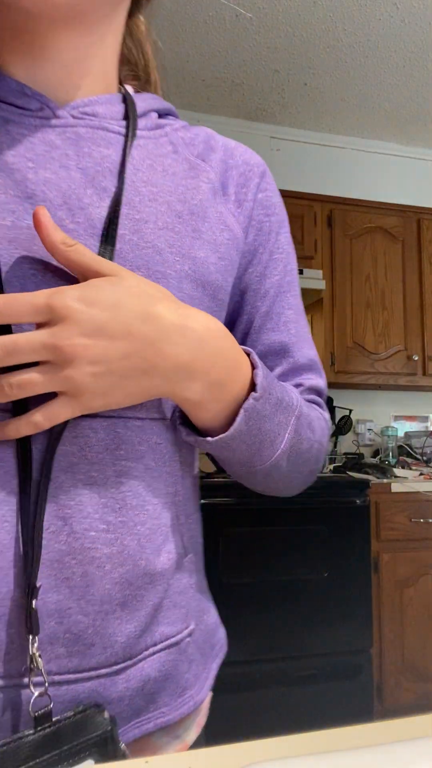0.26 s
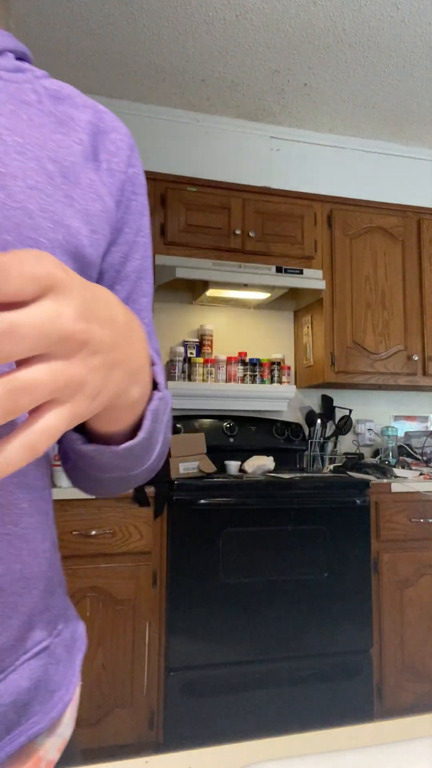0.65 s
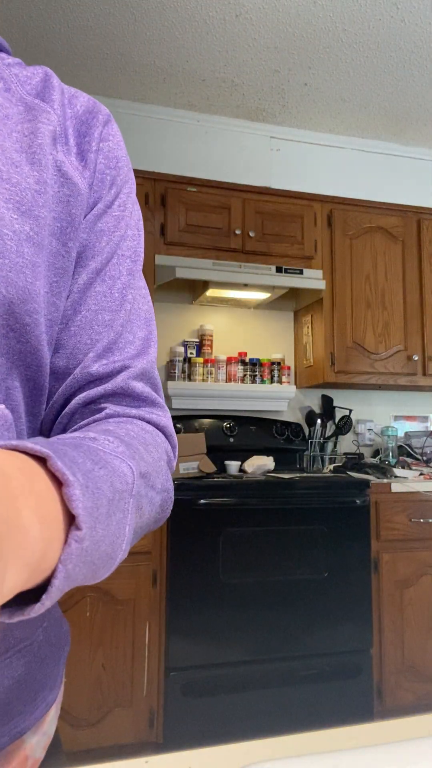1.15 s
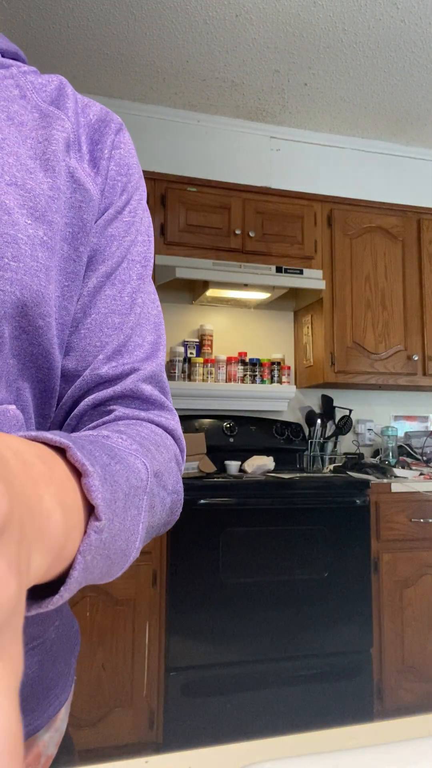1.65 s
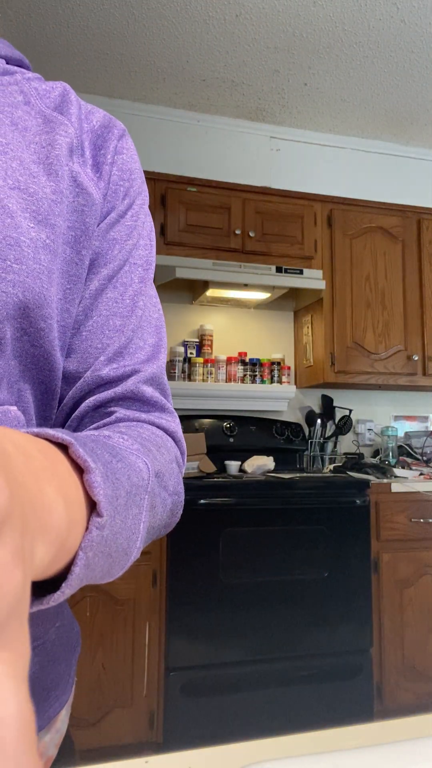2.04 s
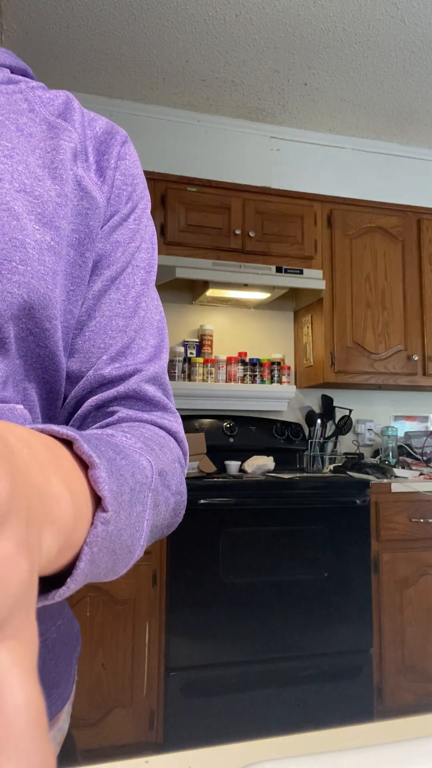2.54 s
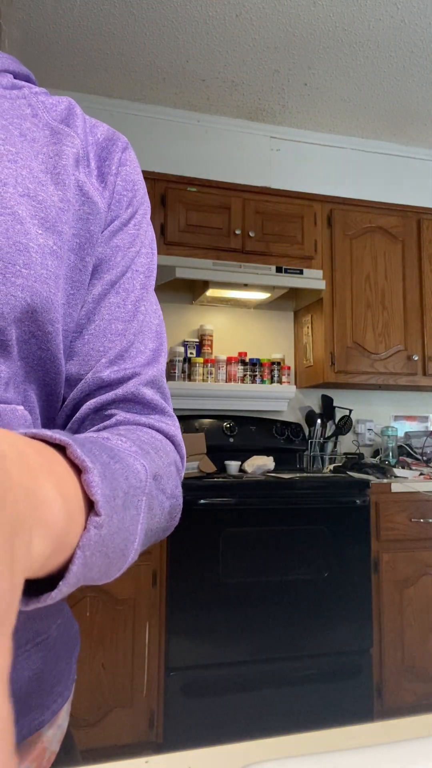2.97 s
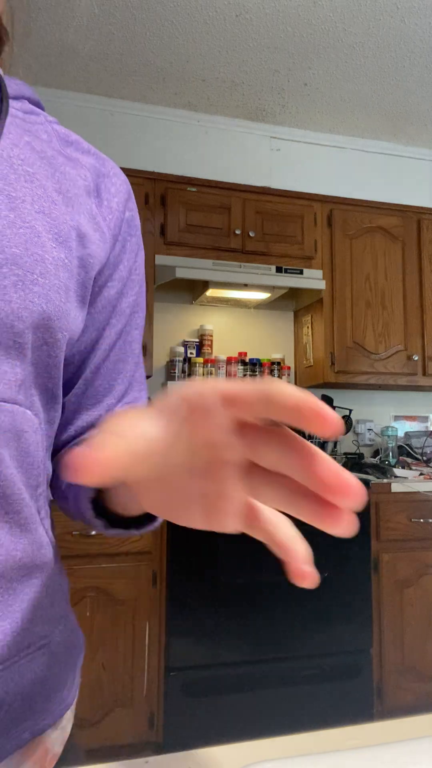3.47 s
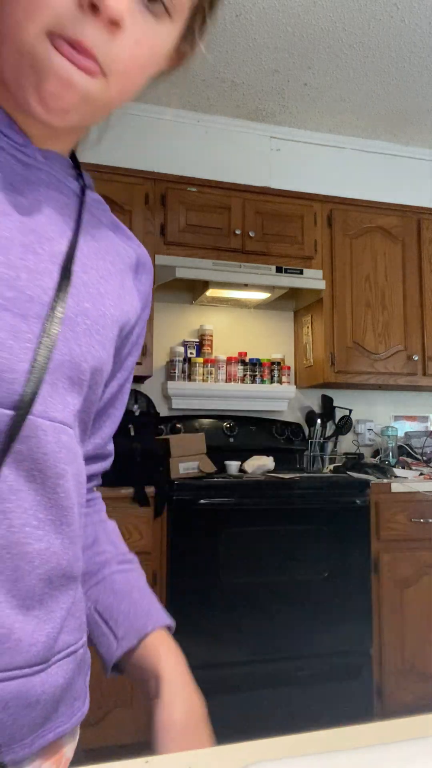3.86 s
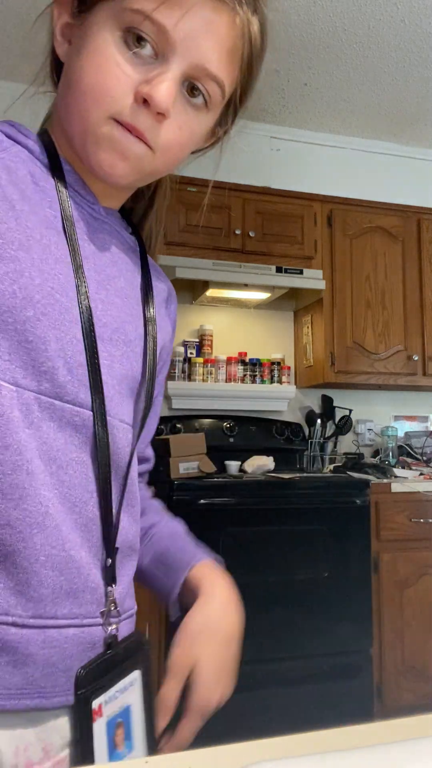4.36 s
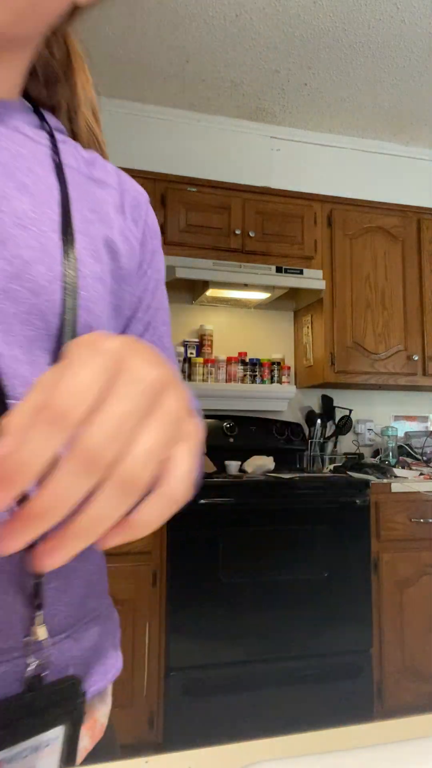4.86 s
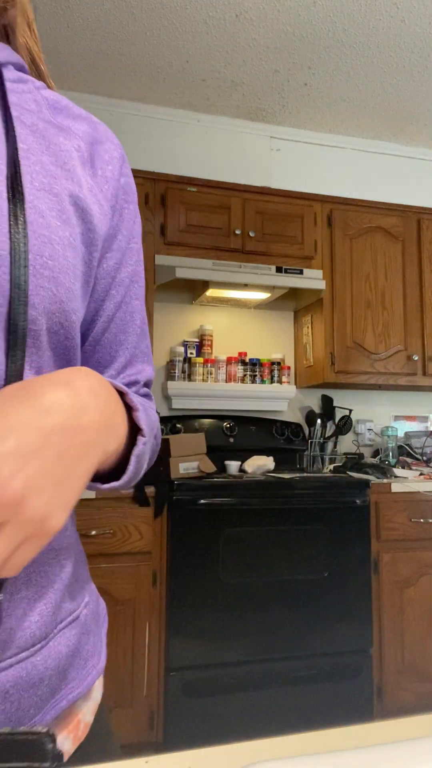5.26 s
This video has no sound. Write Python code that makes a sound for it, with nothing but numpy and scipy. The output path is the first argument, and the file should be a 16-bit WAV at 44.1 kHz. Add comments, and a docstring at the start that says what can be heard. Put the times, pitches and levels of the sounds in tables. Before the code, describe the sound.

Ice cubes clink and rattle irregularly in a drinking glass swirled on a kitchen counter, with brief pauses and a faint appliance hum.

```python
"""Ice cubes tumble in a drinking glass that is swirled and shifted on a kitchen counter, close to the left of a phone.
Each contact rings damped modes of wall and counter under a noisy ice crack; a few bumps move the counter alone.
Surges of random grains make the rattle, the thump and the icy hiss between the contacts.
Filtered noise makes a rustling sleeve and the air, wavering sines an appliance's hum, decaying noise the echo."""
import sys
import numpy as np
from scipy import signal
from scipy.fft import rfft, irfft, next_fast_len
from scipy.io import wavfile

SR = 44100
rng = np.random.default_rng(int(sys.argv[2]) if len(sys.argv) > 2 else 0)


def wrap_up_sound(samples):
    """Save the sound to the file named by the first command line argument, as 16-bit audio."""
    columns = np.atleast_2d(samples).T
    # keep every value between -1 and 1, then stretch to whole-number steps
    tamed = np.clip(columns, -1, 1)
    steps = np.round(tamed * 32767).astype(np.int16)
    wavfile.write(sys.argv[1], SR, steps)


def elevation(decibels):
    """Turn decibel levels (scalar or array-like) into linear amplitude ratios."""
    levels = np.asarray(decibels, float)
    return 10 ** (levels / 20)


N = 243299

# modes of the counter under the glass, then three wall modes with their damped neighbours:
# (nominal f/Hz, relative level/dB, t60/s)
RINGS = [(82, -20, .07), (188, -16, .09), (340, -16, .03), (576, -3, .065), (700, -4, .04), (805, -6, .04),
         (941, -9, .045), (1355, -9, .025), (1850, -6, .01), (2300, 3, .017), (2546, -12, .03),
         (2880, -9, .016), (2290, -14, .1), (4990, -8, .025), (5250, 0, .045), (5246, -10, .15),
         (9235, 1, .045), (9229, -10, .125)]
# the pack of ice surges against the wall:
# (t/s at full strength, build-up/s, hold/s, rattle level/dB, fine hiss level/dB)
SURGES = [(.414, .03, .0, -58, -41.5), (0.544, 0.18, .0, -32.5, -61), (0.742, 0.026, .04, -30.5, -50),
          (.98, 0.13, .0, -19.5, -58.5), (1.191, 0.59, .05, -33, -55), (1.364, 0.19, 0.02, -51, -73.5),
          (1.438, 0.018, .1, -35.5, -46), (1.776, 0.12, .0, -43, -62.5), (1.83, 0.031, .0, -51, -58),
          (1.963, 0.072, .0, -28, -39), (2.321, 0.055, .02, -43, -52.5), (2.519, 0.023, .02, -26, -42.5),
          (2.758, 0.13, .0, -31.5, -55), (3.009, 0.019, .0, -55.5, -57), (3.089, 0.088, .03, -34, -41.5),
          (3.338, 0.12, .03, -50.5, -70.5), (3.571, .03, .03, -28.5, -47.5), (3.646, .05, .1, -42, -68.5),
          (3.881, 0.22, .0, -39.5, -61), (4.048, 0.13, .0, -45, -62), (5.066, 0.025, .0, -34, -42.5),
          (5.225, 0.061, .0, -47.5, -57), (5.373, 0.015, .0, -41.5, -57.5)]


def clinks():
    """Each contact excites the modes zone by zone, and the cube cracks and chinks.
    The wall radiates in lobes, so each mode of each blow leans a little to one side."""
    zones_hz = [1700, 4000, 7500]  # borders between counter, first, second and third wall mode [f/Hz]
    t = np.arange(SR // 4) / SR
    front, lean, cracks = np.zeros((3, N + SR))
    hz, level, t60 = np.transpose(RINGS)[:, :, None]
    shape = elevation(level) * fade(t, t60, .001 + .6 / hz)  # wet ice lands softly
    zone = np.searchsorted(zones_hz, hz)
    # the first mode lasts longest when the wall is free and the second rings too
    lasting = (zone == 1) & (t60 > .08)
    blows = contacts()
    chance = rng.standard_normal((len(blows), 5, len(RINGS), 1))
    for (s, free_db, *blow, crack), (stray, detune, lobe, cube, cube_size) in zip(blows, chance):
        span = slice(round(s * SR), round(s * SR) + len(t))
        # ice and drink load the wall: damped modes shift most
        phase = 2 * np.pi * (hz + detune * 1.65 / t60) * t
        lasting_db = (blow[1] + blow[2]) / 2 + 5 + free_db
        strength_db = np.where(lasting, lasting_db, np.take(blow, zone))
        size = elevation(strength_db + 2 * stray) * shape
        # every cube and face has its own short-lived modes
        chink_hz = 3800 * np.exp(.42 * cube[:5])
        chink_size = elevation(crack + 2 + 3 * cube_size[:5]) * fade(t, .016, .001)
        chink = chink_size * np.sin(2 * np.pi * chink_hz * t)
        front[span] += np.sum(size * np.sin(phase), axis=0) + np.sum(chink, axis=0)
        lean[span] += np.sum(size * np.cos(phase) * lobe, axis=0)
        snap = elevation(crack - 9) * fade(t, .0035, .00037)
        crackle = elevation(crack - 4.5) * fade(t, .065, .0005)
        cracks[span] += snap + crackle
    return front[:N] + cracks[:N] * icy(rng.standard_normal(N)), lean[:N]


def contacts():
    """Where a cube lands sets which zones it excites.
    Rows: (t/s, long ring, counter, first, second, third mode and crack level/dB)."""
    # a cube knocks low on the wet wall: (t/s, drive level/dB of the counter, the first wall mode, the ice crack)
    knocks = [(0.2139, -31, -38, -45), (0.2864, -35, -63.5, -55), (0.4006, -33, -34.5, -40),
              (.494, -49, -34, -41), (.4987, -37.5, -20, -32.5), (0.5316, -30, -9, -53),
              (0.5437, -23, -41.5, -35.5), (0.5846, -32.5, -30.5, -49), (0.7231, -31.5, -35, -37),
              (0.764, -17, -6, -32), (.804, -44, -15.5, -45.5), (.851, -23, -24, -43),
              (0.9051, -25.5, -37.5, -48.5), (0.9111, -20.5, -48, -48), (.932, -17.5, -35, -40),
              (.9481, -15.5, -13, -26.5), (.969, -6.5, -4.5, -35), (1.026, -31.5, -29.5, -30.5),
              (1.051, -28.5, -13.5, -42), (1.0665, -49, -14.5, -38), (1.0878, -23, -18, -34),
              (1.102, -19.5, -14.5, -58), (1.1226, -19, -23, -35), (1.1472, -22, -38.5, -41.5),
              (1.1855, -24, -19.5, -44.5), (1.2205, -24.5, -13, -34.5), (1.226, -14, -10, -40.5),
              (1.372, -54.5, -55, -58), (1.406, -54.5, -48, -52), (1.4477, -23.5, -26.5, -36),
              (1.4764, -38.5, -14.5, -47.5), (1.494, -18.5, -21.5, -42), (1.5188, -19, -49, -60),
              (1.5428, -20, -18.5, -38.5), (1.5555, -16, -31, -66), (1.639, -57, -55, -59.5),
              (1.653, -50, -55.5, -56.5), (1.728, -40, -32, -54.5), (1.762, -30.5, -51.5, -39.5),
              (1.7719, -20.5, -63.5, -41), (1.8211, -55, -47, -42), (1.8505, -42.5, -60, -59),
              (1.925, -31.5, -42, -38.5), (1.9447, -18.5, -19.5, -30), (1.9559, -15.5, -14.5, -36),
              (1.9739, -15.5, -40, -31.5), (2.294, -50.5, -48, -62), (2.3103, -37, -22, -26),
              (2.3186, -29.5, -44, -29), (2.532, -23.5, -20.5, -33), (2.5493, -20, -28.5, -35),
              (2.57, -17.5, -12, -47.5), (2.612, -58.5, -51.5, -39), (2.632, -25, -33, -61.5),
              (2.714, -37.5, -18, -41.5), (2.7258, -21.5, -12.5, -32.5), (2.7349, -22, -6.5, -31),
              (2.756, -18, -23, -40), (2.83, -49.5, -21, -45.5), (2.879, -43.5, -38, -65.5),
              (2.937, -56, -51.5, -82), (3.0323, -51.5, -25, -56), (3.0646, -11.5, -18.5, -23),
              (3.0778, -17, -30.5, -46), (3.0927, -41.5, -32.5, -29), (3.1232, -21.5, -42, -61),
              (3.1621, -24.5, -33, -66), (3.1771, -18.5, -29, -57), (3.231, -51, -59, -57.5),
              (3.2577, -51, -66, -63), (3.3104, -27.5, -31, -71), (3.3309, -34.5, -56, -34.5),
              (3.3594, -30, -26.5, -54), (3.4029, -63.5, -60, -39.5), (3.4334, -50, -34, -43),
              (3.549, -39, -32.5, -63), (3.5557, -32.5, -50, -49), (3.5701, -15, -12, -34.5),
              (3.5788, -12.5, -9, -30.5), (3.6227, -15, -36, -34.5), (3.6357, -27.5, -26, -47),
              (3.6606, -22, -43.5, -50), (3.6854, -31.5, -38, -40.5), (3.7, -19, -4, -32),
              (3.816, -32.5, -11.5, -37), (3.8614, -27, -12.5, -40), (3.8925, -19, -11.5, -43.5),
              (3.9055, -54.5, -56, -33.5), (4.0144, -28, -27.5, -63), (4.0479, -39, -6, -35.5),
              (4.2133, -50, -28, -77), (4.286, -59, -57.5, -70), (4.3041, -41.5, -67, -79.5),
              (5.0589, -22.5, -15.5, -35.5), (5.0795, -26, -18.5, -61.5), (5.3603, -40, -35, -33),
              (5.374, -23, -50, -53)]
    # a cube pings the free rim: (t/s, drive level/dB of the first, second, third wall mode, the ice crack)
    pings = [(.4073, -34.5, -27, -17, -37), (.413, -41, -23.5, -15.5, -42),
             (0.4357, -41.5, -30.5, -28.5, -56.5), (.4666, -40.5, -33.5, -28, -55),
             (.5029, -36, -31, -45.5, -49), (0.7396, -27, -35.5, -38.5, -36.5),
             (0.7713, -21.5, -31.5, -55, -43.5), (0.9477, -31.5, -19, -58.5, -44),
             (.969, -33.5, -16, -33, -48), (0.9801, -18, -26.5, -42, -39), (1.075, -39.5, -27, -48.5, -37),
             (1.093, -39, -45, -41.5, -48), (1.1231, -35.5, -20, -35.5, -45),
             (1.829, -35, -46.5, -42, -39.5), (1.862, -38, -49, -59, -55), (1.9052, -49, -41, -51, -61),
             (2.3604, -56.5, -30, -37, -34), (2.4981, -34.5, -43.5, -52.5, -51),
             (2.514, -40.5, -35.5, -47, -34.5), (2.5208, -49.5, -30.5, -34.5, -59),
             (2.7045, -31.5, -48, -37.5, -55), (2.9973, -35, -30, -18, -36),
             (3.014, -30.5, -27, -34.5, -54.5), (3.0636, -28, -29.5, -27, -54),
             (3.5649, -33, -56, -27.5, -25.5), (4.023, -41.5, -54, -28.5, -35),
             (4.42, -40.5, -70, -84, -80), (4.7144, -70, -30.5, -29.5, -46), (5.0951, -45, -34, -31, -35),
             (5.1, -56, -30, -22.5, -42.5), (5.2273, -31, -39, -36.5, -34),
             (5.235, -34.5, -43.5, -31.5, -54), (5.344, -30.5, -23.5, -29, -34.5),
             (5.4246, -36.5, -32, -38, -56), (5.4348, -67, -32.5, -31.5, -37)]
    second_db, third_db = -29.5, -18.5  # a knock's second mode against its first, its third against its crack
    grip_s, grip_db = 2.3, -44  # from here the hand grips tighter: a knock's long first-mode ring drops this much
    free_rim_db = 1  # a ping leaves the long first-mode ring this much stronger
    counter_db = -19  # a ping's counter knock against its second mode
    low = [(s, grip_db * (s > grip_s), counter, first, first + second_db, crack + third_db, crack)
           for s, counter, first, crack in knocks]
    rim = [(s, free_rim_db, second + counter_db, first, second, third, crack)
           for s, first, second, third, crack in pings]
    return low + rim


def thuds():
    """A soft, heavy contact of glass and counter moves only the two lowest modes of the slab."""
    # the glass bumps the counter: (t/s, lowest mode's drive level/dB, second mode's level/dB relative to it)
    bumps = [(0.552, -19, -5), (0.726, -23.5, 2.5), (0.768, -21, 4.5), (0.923, -26, -2.5),
             (0.985, -22, -19), (1.125, -33.5, -11.5), (1.964, -20.5, -19), (2.53, -33, -7.5),
             (3.063, -33, 8), (3.572, -27, 5.5), (3.631, -21, -20), (3.736, -22.5, -22.5), (5.072, -26, 0)]
    out, t = np.zeros(N + SR), np.arange(SR // 4) / SR
    hz, _, t60 = np.transpose(RINGS[:2])[:, :, None]
    shape = fade(t, t60, .0032) * np.sin(2 * np.pi * hz * t)
    for s, low_db, second_db in bumps:
        out[round(s * SR):][:len(t)] += elevation([low_db, low_db + second_db]) @ shape
    return out[:N]


def swirl():
    """Ice rubs along the wall and the glass rocks on the counter: grains excite the modes in surges."""
    rattle_db, hiss_db = np.transpose(SURGES)[3:]
    thump_db = rattle_db - 9
    rattle = ringing(grains(per_s=600, spread_db=5), lo_hz=450, hi_hz=4000)
    thump = ringing(grains(per_s=300, spread_db=3), lo_hz=50, hi_hz=450)
    hiss = icy(grains(per_s=2200, spread_db=5.5))
    out = surging(rattle_db, fall=413) * rattle
    out += surging(thump_db, fall=217) * thump
    out += surging(hiss_db, fall=410) * hiss
    return out


def surging(peak_db, fall):
    """Gain over time: every surge builds up, holds and falls away at fall dB a second."""
    build_db = 40  # growth over the build-up
    t, gain = np.arange(N) / SR, 0
    for (s, build, hold, *_), db in zip(SURGES, peak_db):
        below_db = build_db * np.maximum(s - t, 0) / max(build, .005)
        fallen_db = fall * np.maximum(t - s - hold, 0)
        gain = gain + elevation(db - below_db - fallen_db)
    return gain


def grains(per_s, spread_db):
    """Tiny knocks at random moments and strengths over a faint rub."""
    at, size = rng.random(N), rng.standard_normal((2, N))
    knocks = (at < per_s / SR) * elevation(spread_db * size[0]) * np.sign(size[1])
    return knocks + .053 * size[1]


def ringing(x, lo_hz, hi_hz):
    """x through the modes between lo and hi as parallel resonances of alternating sign, rms 1."""
    modes = [(c, 3 / t60 + 15, db) for c, db, t60 in RINGS if lo_hz < c < hi_hz]  # centre Hz, width Hz, dB

    def body(f):
        total = 0
        for k, (c, w, db) in enumerate(modes):
            total = total + (-1) ** k * elevation(db) * 1j * f * w ** .5 / (c * c - f * f + 1j * f * w)
        return total

    return unit(filtered(x, body))


def icy(x):
    """The bright colour of ice on glass, rms 1."""
    crack_colour = [(700, -30.5), (1500, 15), (3000, 7.5), (6000, 14), (9000, 5), (12000, 2.5),
                    (16000, -55)]  # spectrum of cracking ice: (f/Hz, relative density level/dB per Hz)
    return unit(filtered(x, lambda hz: elevation(along(crack_colour, hz))))


def fade(t, t60, rise):
    """Swells with time constant rise seconds under a decay that loses 60 dB in t60."""
    return (1 - np.exp(-t / rise)) * elevation(-60 * t / t60)


def ports(hz):
    """The phone's body shades and delays the right port; the sum of both roughly keeps the source's colour."""
    # microphone pair: (f/Hz, left over right level/dB, left's phase lead/rad)
    pair = [(90, 1.5, .15), (190, 5, .4), (576, 14, .6), (720, 5, 0), (945, 5, -2.4), (1100, 2, -2.2),
            (1600, 3, -2.2), (2290, 8.5, -1.1), (3200, 7, -1), (5250, 1, -.4), (8000, .3, -.7),
            (9229, .1, -1.37), (14000, .1, -2.95)]
    f, shade_db, lead = np.transpose(pair)
    right = elevation(-along(np.c_[f, shade_db], hz)) * np.exp(-1j * along(np.c_[f, lead], hz))
    return np.array([np.ones_like(right), right]) * 2 / (np.abs(1 + right) + .2)


def sleeve():
    """Cloth brushes cloth: noise partly shared by both sides swells quickly and fades."""
    # (start t/s, end t/s, level/dB ahead of the treble roll-off, roll-off f/Hz)
    rustles = [(4.373, 4.468, -56, 4870), (4.655, 5.005, -64, 10730), (5.156, 5.214, -45.5, 4440)]
    t, out = np.arange(N) / SR, 0
    for start, end, db, top_hz in rustles:
        swell = np.clip((t - start) / .015, 0, 1) * np.clip((end - t) / (end - start) * 1.5, 0, 1)
        swish = icy(rng.standard_normal(N) + .93 * rng.standard_normal((2, N)))
        out = out + elevation(db) * swell * filtered(swish, lambda hz: 1 / (1 + (hz / top_hz) ** 2))
    return out


def kitchen(x):
    """Each frequency of the room's answer dies at its own speed; every third of a second meets it anew."""
    decay = [(200, 0.3), (1000, .35), (3000, 0.16), (10000, 0.18)]  # echo: (f/Hz, t60/s)
    out, step = np.zeros((2, N + 2 * SR)), SR // 3
    for a in range(0, N, step):
        hz, t, z = signal.stft(rng.standard_normal((2, SR // 2)), SR, nperseg=256)
        dying = z * elevation(-60 * t / along(decay, hz)[:, None])
        tail = signal.istft(dying, SR, nperseg=256)[1]
        wet = signal.fftconvolve(x[None, a:a + step], tail / np.linalg.norm(tail[0]), axes=1)
        out[:, a + 200:a + 200 + wet.shape[1]] += wet  # 200 samples of pre-delay
    return out[:, :N]


def room_tone():
    """Air and appliance noise from all around, with a few motor lines of wavering phase."""
    colour = [(20, -22), (32, -13), (60, 1), (110, -6.5), (250, -16.5), (500, -10), (800, -19), (1500, -27),
              (3000, -37.5), (6000, -48), (12000, -50), (15000, -80)]  # noise spectrum: (f/Hz, relative density level/dB per Hz)
    alike = [(60, .99), (150, .9), (380, .3), (2380, 0), (6000, .6), (15000, -.7)]  # stereo width of the noise: (f/Hz, left-right likeness -1 to 1)
    motor = [(279.9, -66.5), (360.7, -65), (473.7, -78)]  # appliance: (f/Hz, sine amplitude level/dB ahead of the panning)

    def mid_side(hz):
        turn = np.arccos(np.clip(along(alike, hz), -1, 1)) / 2
        return elevation(along(colour, hz)) * [np.cos(turn), np.sin(turn)]

    mid, side = filtered(rng.standard_normal((2, N)), mid_side)
    air = elevation(-55) * np.array([mid + side, mid - side]) / np.std(mid)
    t = np.arange(N) / SR
    drift = np.cumsum(rng.standard_normal((len(motor), N)), axis=1) * .004  # radians
    hum = sum(elevation(db) * np.sin(2 * np.pi * hz * t + d) for (hz, db), d in zip(motor, drift))
    return air * elevation([[1.5], [-1.5]]) + hum * elevation([[2.5], [-3]])


def unit(x):
    """Scaled to rms 1."""
    return x / np.sqrt(np.mean(x ** 2) + 1e-20)


def along(points, hz):
    """(Hz, value) points read on a log axis."""
    f, v = np.transpose(points)
    return np.interp(np.log(hz + 1), np.log(f + 1), v)


def filtered(x, response):
    """x times a real or complex response of frequency."""
    m = next_fast_len(N + SR // 2)
    return irfft(rfft(x, m) * response(np.fft.rfftfreq(m, 1 / SR)), m)[..., :N]


def scene():
    """Glass at the left, its echo, the sleeve and the quiet kitchen."""
    front, lean = clinks()
    glass = front + thuds() + swirl()
    # a second, independent swirl widens the rubbing; only the middle range reaches the ports unalike
    lean = filtered(lean + swirl(), lambda hz: (hz > 230) * (hz < 7500))
    direct = filtered(glass + lean * np.array([[.3], [-1]]), ports)
    # bass travels through the counter, little through the air
    echo = filtered(kitchen(glass), lambda hz: hz / (hz + 300))
    return direct + elevation(-12.5) * echo * elevation([[1.5], [-1.5]]) + sleeve() + room_tone()


def band_limit(x):
    """A steep low-pass at the top of the band."""
    return signal.sosfilt(signal.butter(12, 16810, fs=SR, output="sos"), x)


def record(dry):
    """The loudest peaks are rounded off smoothly towards a ceiling of 1.3."""
    mix = dry / (1 + np.abs(dry / 1.3) ** 6) ** (1 / 6)
    return band_limit(mix)


dry = scene()
out = record(dry)
wrap_up_sound(out)
```